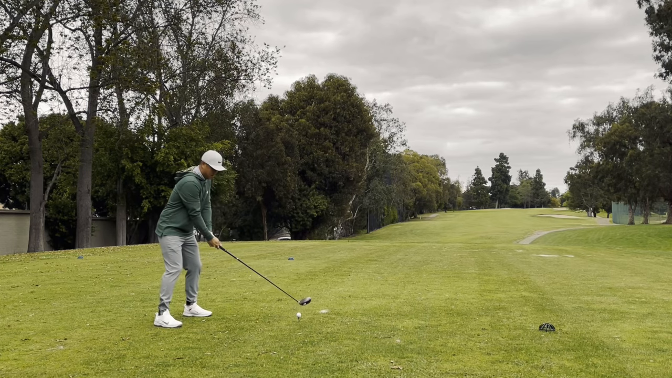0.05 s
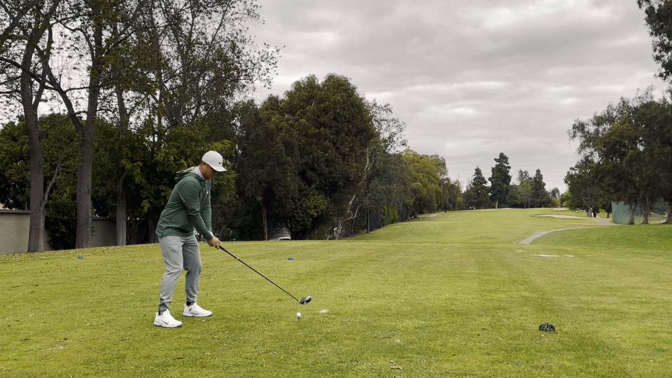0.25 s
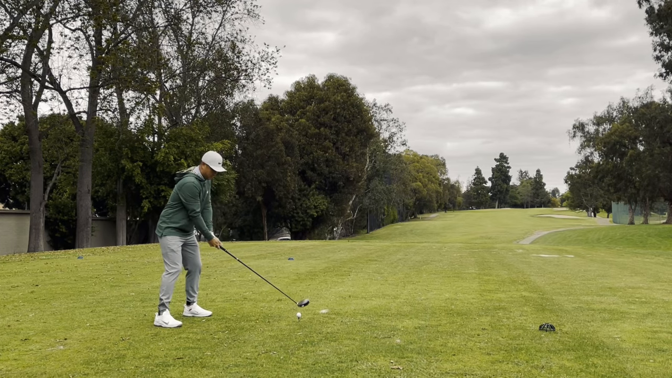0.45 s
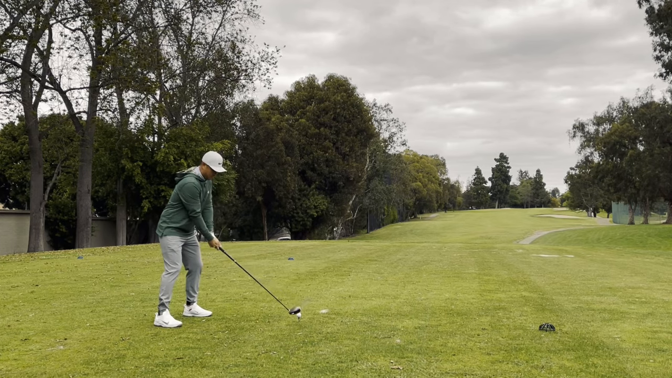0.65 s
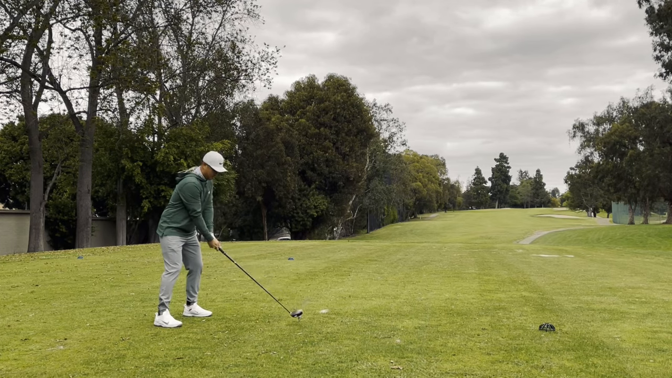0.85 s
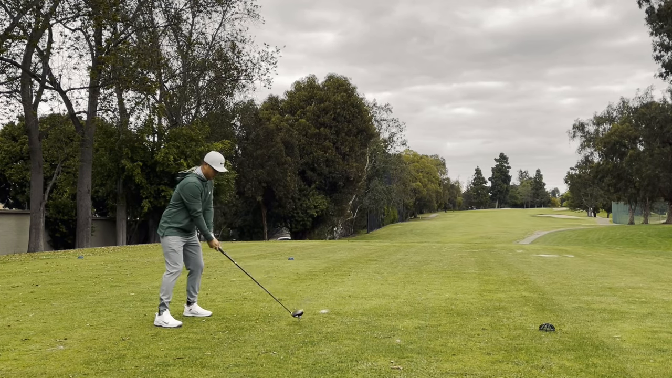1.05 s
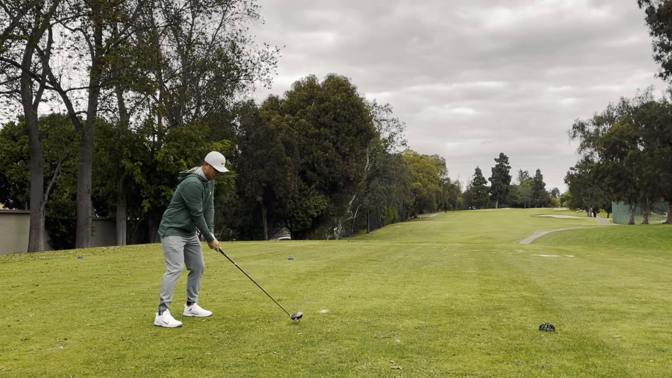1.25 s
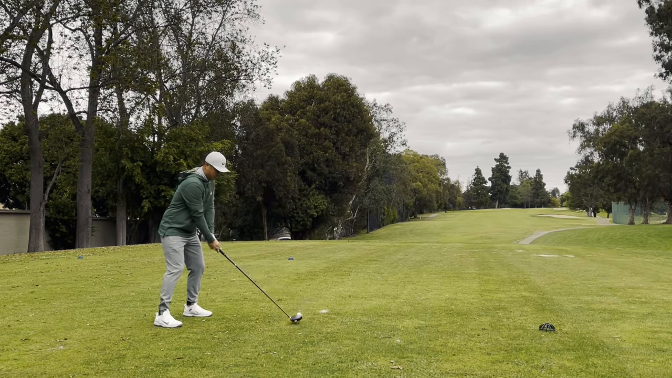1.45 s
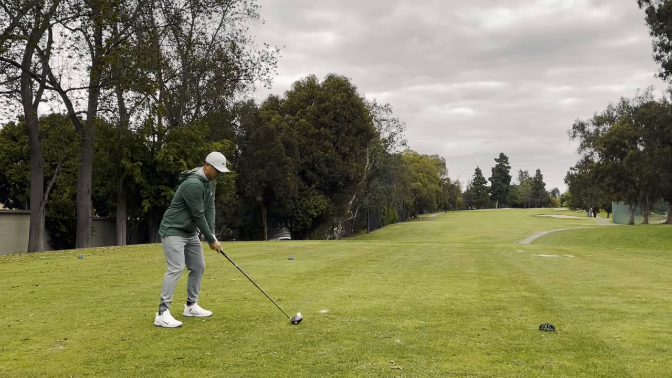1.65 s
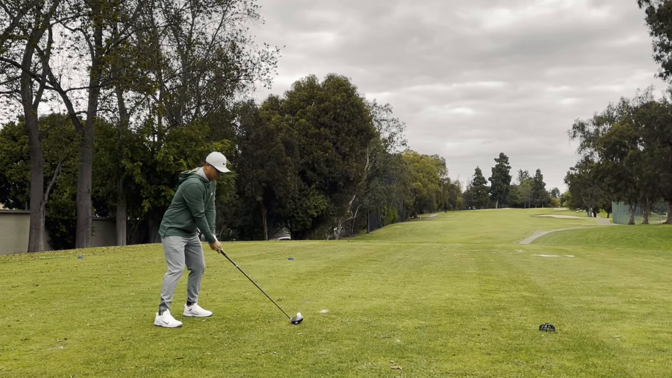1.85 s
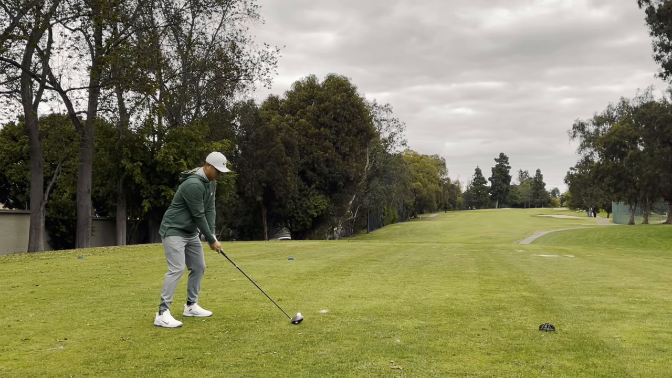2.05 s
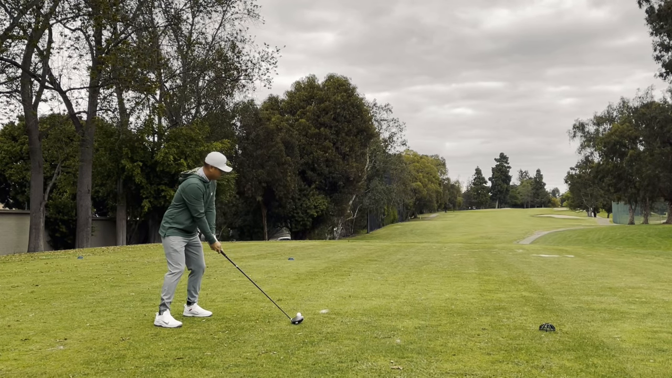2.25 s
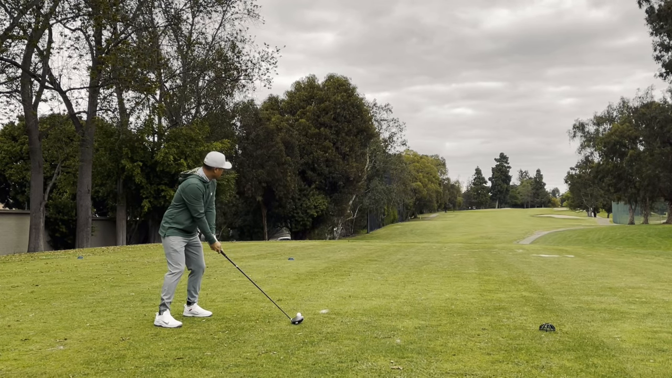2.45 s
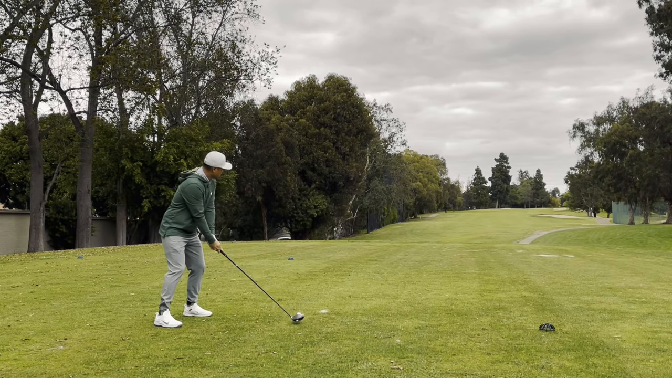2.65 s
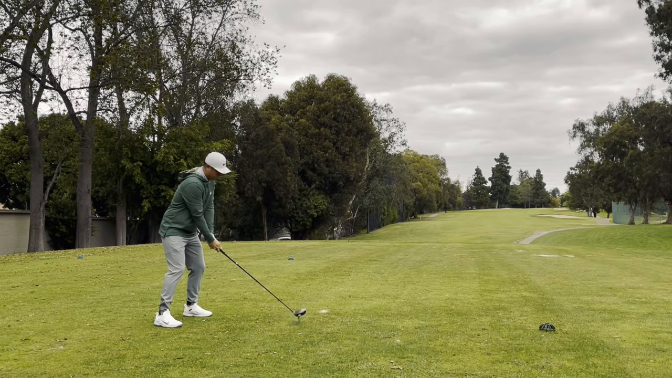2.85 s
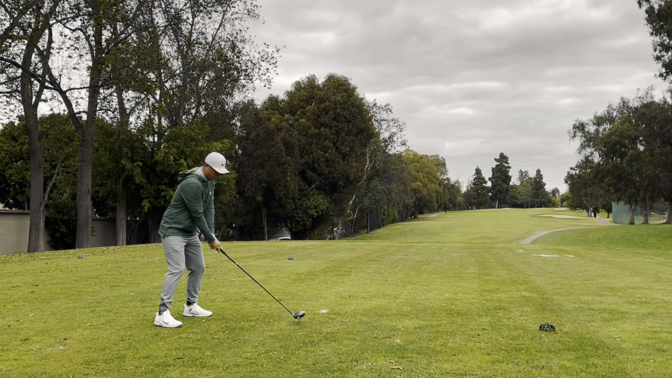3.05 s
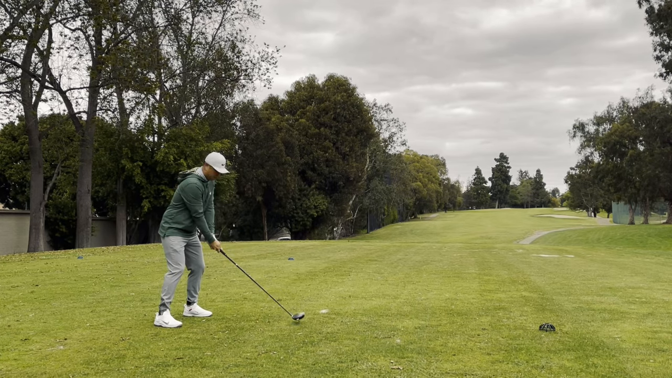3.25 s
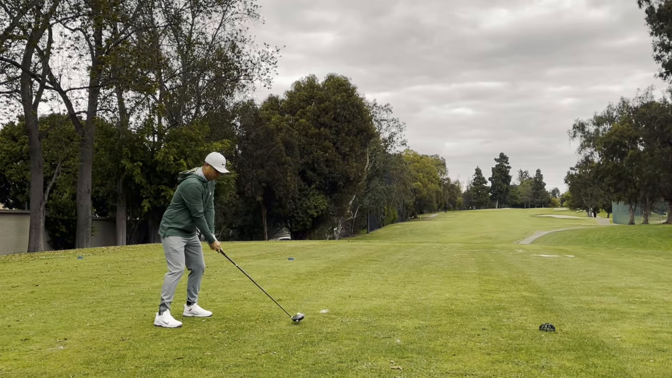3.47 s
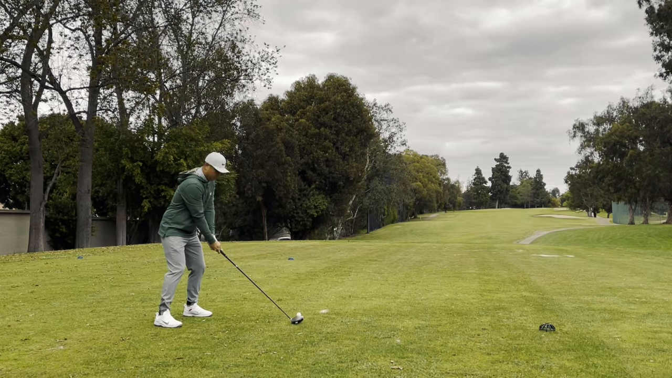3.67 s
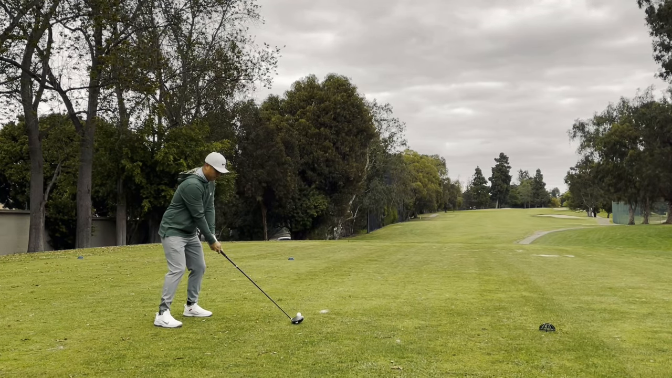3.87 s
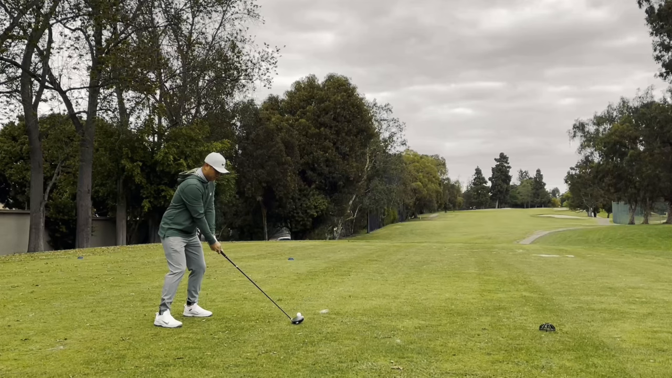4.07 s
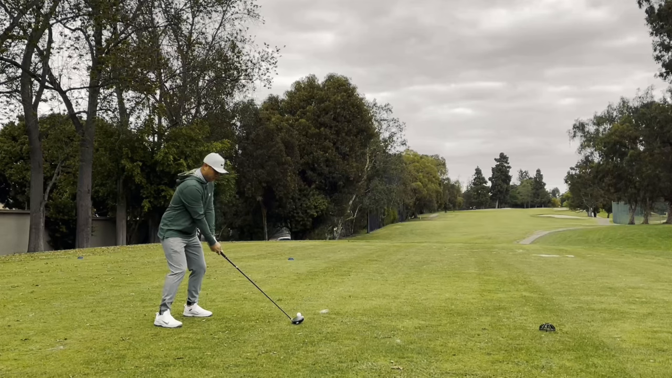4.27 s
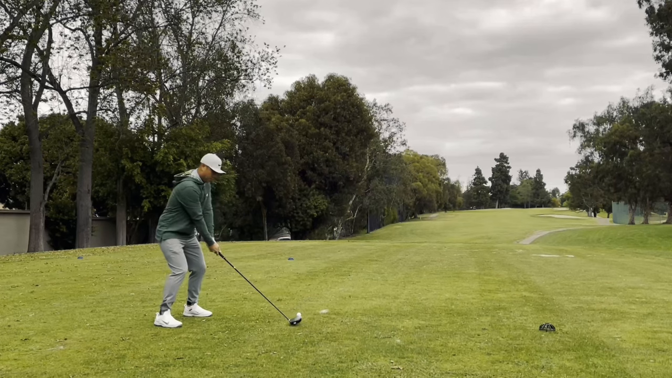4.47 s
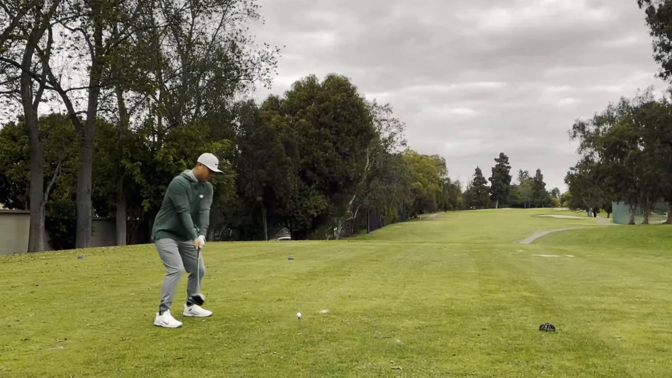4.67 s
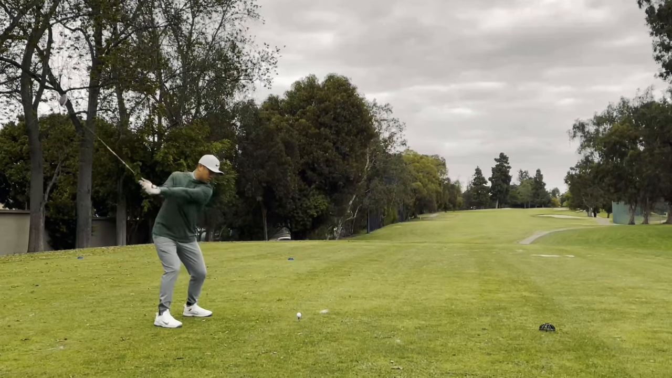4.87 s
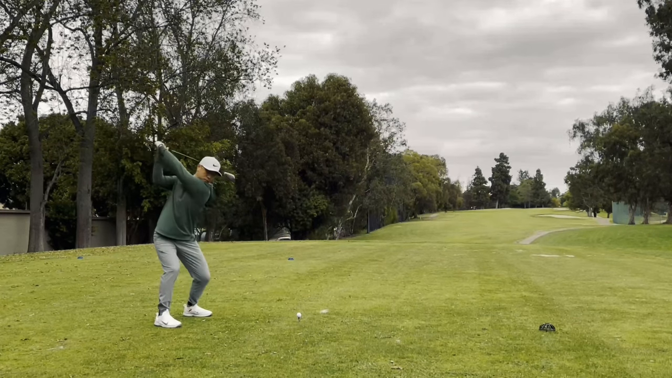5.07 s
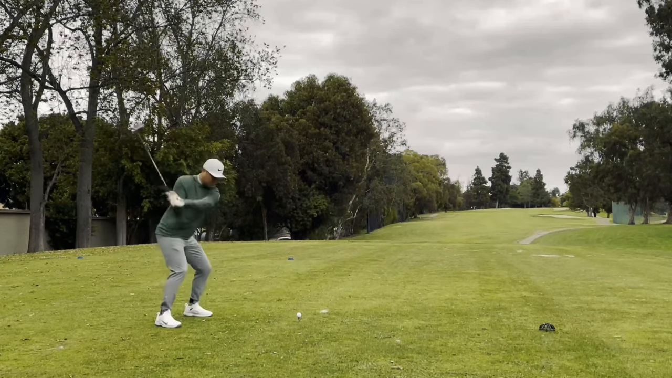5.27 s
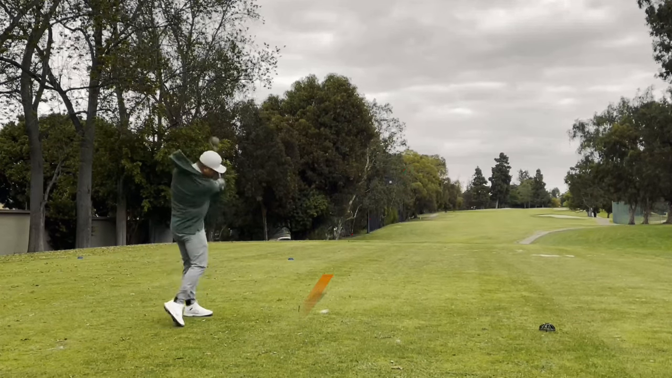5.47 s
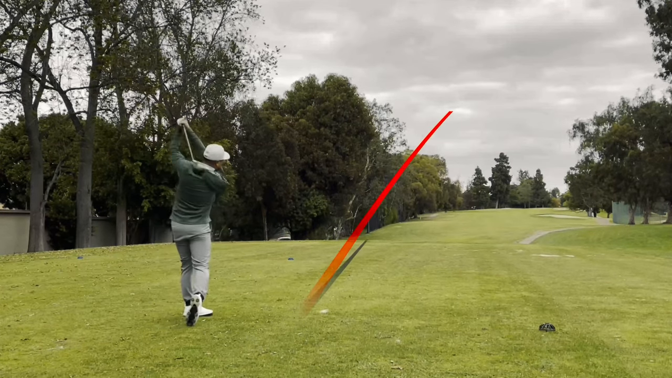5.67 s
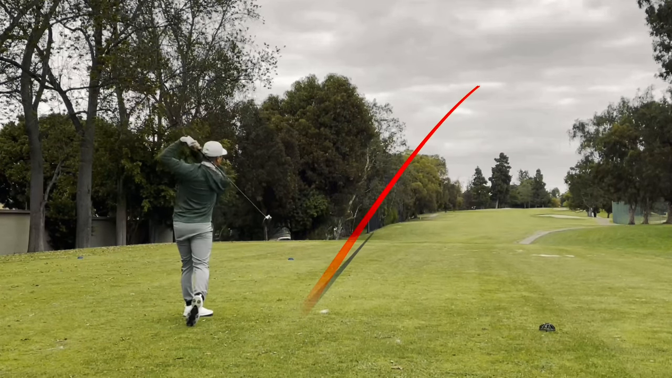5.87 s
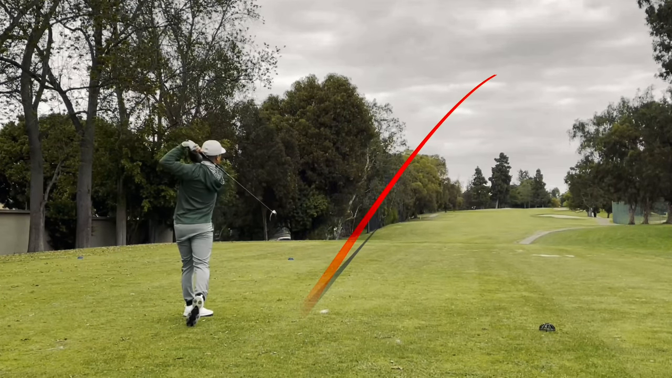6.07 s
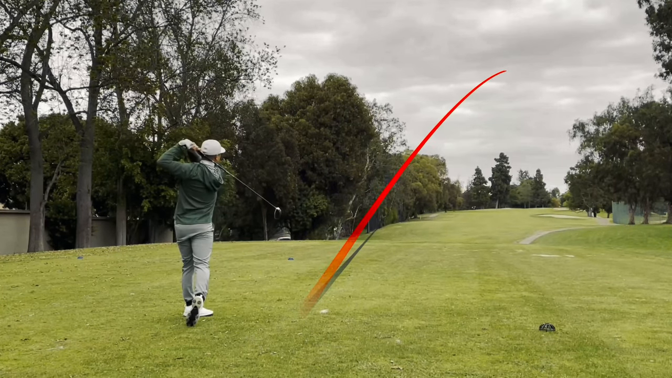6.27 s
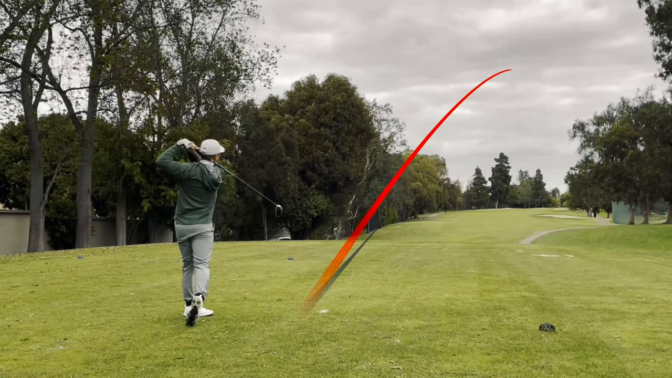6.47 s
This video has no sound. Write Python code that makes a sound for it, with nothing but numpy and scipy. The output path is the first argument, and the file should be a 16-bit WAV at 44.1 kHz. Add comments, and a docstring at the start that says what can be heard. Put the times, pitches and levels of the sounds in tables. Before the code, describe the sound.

Quiet golf course with far engine drone and a few bird chirps, then a quick whoosh, a loud hollow metallic crack and short woodland echo.

```python
"""A golf club swishes down and its hollow head cracks against a ball; the trees throw the crack back.
The swish is shaped noise, the crack a pressure pulse plus ringing modes, the echoes fading noise.
Before and after, sine-wave engines hum over the shaped noise of far traffic and leaves.
Birds whistle and cry with gliding sines, the club taps the turf, and there are faint ticks and clinks.
A limiter ducks everything for a moment after the crack."""
import sys
import numpy as np
from scipy import signal
from scipy.fft import irfft, next_fast_len
from scipy.io import wavfile
from scipy.ndimage import uniform_filter1d, minimum_filter1d

SR = 44100
rng = np.random.default_rng(int(sys.argv[2]) if len(sys.argv) > 2 else 0)


def digitize_waveform(pressure):
    """Quantize a signal to 16-bit integers and store it at the path in sys.argv[1].

    Rows of a 2-D input are taken as channels; values are limited to [-1, 1].
    """
    field = np.atleast_2d(pressure).T
    bounded = np.clip(field, -1, 1)
    quanta = np.round(bounded * 32767).astype(np.int16)
    wavfile.write(sys.argv[1], SR, quanta)


N = 287487
T = np.arange(N) / SR   # time of every sample, s
HZ = np.maximum(np.fft.rfftfreq(next_fast_len(N), 1 / SR), 1)   # pitch of every spectrum bin

# How alike left and right are in open air. Each row: frequency in Hz, likeness (1 is identical).
AIR_LIKENESS = [(60, 1), (130, 0.72), (260, 0.68), (450, 0.8), (800, 0.1), (1300, 0.97), (2500, 0.41),
                (5000, 0.58), (9000, 1), (11500, 1)]
# The same for far tyres. Each row: frequency in Hz, likeness (1 is identical).
TYRE_LIKENESS = [(60, 0.93), (170, 0.7), (500, 0.43), (1450, 0.34), (4180, 0.28), (12100, 0.12)]

# Distant engine running almost steadily. Each row: time in seconds, firing rate in Hz, hum level in dB.
ENGINE = [(0, 66.6, -38.5), (1.5, 66.6, -37), (2.2, 66.7, -33), (3.6, 66.8, -35), (3.9, 67.2, -31),
          (4.1, 66.3, -37.5), (5.6, 66.8, -38.5), (6.15, 67.9, -36.5)]
# The engine's overtones. Each row: multiple of the firing rate, level in dB at the top of the swell.
ENGINE_OVERTONES = [(2, -37.5), (3, -52)]
LOUDEST_S, SWELL_S, SWELL_DB = 5.14, 1, 5   # when the overtones peak, half width and depth of the swell

# Slow swells of the far traffic.
# Each row: time in seconds, rumble level in dB, tyre roar level in dB, tyre hiss level in dB.
TRAFFIC = [(0, -37.5, -49, -60.5), (.55, -38.5, -48.5, -59.5), (1.6, -38.5, -48.5, -59),
           (2.4, -39.5, -48.5, -58.5), (2.9, -38, -48, -57.5), (3.6, -40, -48, -59), (4.5, -38.5, -47, -58),
           (5.3, -39.5, -46.5, -58.5), (6.5, -40.5, -46, -54.5)]
# Colour of the traffic rumble. Each row: frequency in Hz, relative level in dB.
RUMBLE_COLOUR = [(20, -32), (35, -14), (48, -2), (60, 8.5), (76, -0.5), (105, -2.5), (160, -7.5),
                 (250, -15.5), (340, -22), (600, -49)]
# Colour of the tyre roar. Each row: frequency in Hz, relative level in dB.
ROAR_COLOUR = [(150, -26.5), (300, -4.5), (480, -2.5), (650, 0), (920, 3), (1300, -0.5), (2000, -7),
               (2600, -19.5)]
# Colour of the tyre hiss. Each row: frequency in Hz, relative level in dB.
HISS_COLOUR = [(1000, -6), (2000, 0.5), (2600, 2), (3300, -2.5), (4500, -8), (6500, -14), (9000, -48.5),
               (12000, -31)]

# Rumble under the second vehicle. Each row: frequency in Hz, relative level in dB.
PASS_COLOUR = [(20, -23.0), (35, -12.5), (50, 9.5), (65, -2.5), (100, -23)]
PASS_S, PASS_HALF_S, PASS_DB = .62, .55, -33   # loudest moment, half length, drone level
PASS_HZ, PASS_RISE_HZ_PER_S = 59.5, 5   # drone pitch at the loudest moment, and its rise

# Gusts in the leaves. Each row: middle in seconds, half length in seconds, level in dB.
GUSTS = [(0.952, 0.65, -74), (2.3, 0.82, -80), (6.396, 1.2, -72.5)]
# Colour of rustling leaves. Each row: frequency in Hz, relative level in dB.
LEAF_COLOUR = [(3000, -18.5), (5000, 2), (7500, 1), (9300, -5.5), (11500, -22)]

# Dry ticks. Each row: start in seconds, level in dB.
TICKS = [(0.252, -55.5), (.269, -60), (.325, -52), (0.377, -58), (0.851, -46), (.883, -57), (2.591, -61),
         (5.937, -56), (5.970, -46.5), (6.142, -61)]
# Colour of a tick. Each row: frequency in Hz, relative level in dB.
TICK_COLOUR = [(1200, -14), (2000, 4), (4500, 3), (7000, 5), (9000, -0.5), (11500, -5), (13500, -27)]

# Two calls of a small bird, each a curve.
# Each row of a curve: time in seconds, pitch in Hz, level in dB before the wood.
BIRD_CALLS = [
    [(.862, 4400, -61), (.876, 4600, -57), (.891, 5400, -51), (.908, 5100, -57), (.935, 5300, -60),
     (.965, 5000, -66), (.988, 4850, -58), (1.01, 4500, -54), (1.025, 4600, -62), (1.045, 4450, -57),
     (1.07, 4400, -59), (1.085, 4350, -68)],
    [(2.365, 4400, -70), (2.395, 5400, -57), (2.42, 4880, -59), (2.443, 5000, -68), (2.465, 5550, -56),
     (2.49, 5000, -56), (2.53, 4620, -55), (2.59, 4520, -60), (2.63, 4430, -70)],
]
# Arched whistles far off in the trees. Each row: start in seconds, length in seconds, top pitch in Hz,
# share of the pitch lost at the ends, level in dB before the wood.
FAR_WHISTLES = [(2.12, .13, 2580, .04, -66), (2.24, .15, 2860, .03, -68), (2.24, .18, 2540, .03, -66),
                (2.39, .085, 2780, .12, -64), (2.96, .12, 2860, .03, -68), (6.235, .07, 2480, .08, -57.5),
                (6.25, .055, 3430, .06, -62), (6.275, .05, 3200, .04, -63), (6.32, .04, 3330, .08, -62),
                (6.31, .055, 2400, .08, -53.5)]
# Nasal, arched cries of far birds.
# Each row: start in seconds, length in seconds, top pitch in Hz, level in dB before the wood.
CRIES = [(6.14, .19, 830, -63), (6.225, .135, 635, -55)]
# The partials of a cry. Each row: multiple of its pitch, relative level in dB.
CRY_PARTIALS = [(3, 0), (4, -2), (5, -11)]
CRY_SAG = .13   # share of its pitch that a cry loses at its ends

# Colour of a soft tap on turf. Each row: frequency in Hz, relative level in dB.
TURF_COLOUR = [(60, -20), (200, -2), (290, 0), (450, -7), (800, -22)]

# Light metal clinks, as of clubs in a bag. Each row: start in seconds, base level in dB,
# share of the ring time left by damping, pitch of the snap in Hz.
CLINKS = [(3.807, -61, .5, 6500), (3.919, -61, 0.4, 6600), (4.03, -65, 0.6, 6400), (4.905, -64, 0.55, 6400),
          (4.989, -58, .5, 6500), (5.086, -60, .4, 6500), (5.13, -63, 0.38, 6500), (5.22, -60, 0.44, 6400),
          (6.2236, -41, 0.04, 6850), (6.2804, -46, 0.89, 6400), (6.312, -41.5, 0.04, 5300),
          (6.3346, -55, .15, 6300), (6.370, -41, 0.14, 6250), (6.4866, -55, 0.4, 6400)]
# Modes of the metal that clinks.
# Each row: frequency in Hz, level in dB over the clink's base, undamped time to fall 60 dB in seconds.
METAL_MODES = [(5950, -17, 0.037), (6310, -6, 0.2), (6480, 2, .04), (7200, -24, 0.034)]

# Colour of the swish. Each row: frequency in Hz, relative level in dB.
SWISH_COLOUR = [(150, -24), (400, 6), (1000, 4), (2200, -15), (3400, -4.5), (4600, -4.5), (6300, -7.5),
                (8200, -6), (10400, -9), (12000, -10.5), (13000, -30), (15000, -33.5)]
# Colour of the gust pushed by the head. Each row: frequency in Hz, relative level in dB.
GUST_COLOUR = [(60, -7.0), (200, -3), (450, 8), (950, 5.5), (1600, -8.5), (3300, -10.0), (6500, -21),
               (9000, -30)]
SWISH_DB = -40   # at full speed
# the club gathers speed, keeps it through the ball and slows in the follow-through
SWING_START_S, SPEED_UP_S, FULL_SPEED_S, SLOW_DOWN_S = 5.302, .056, 0.092, 0.2

STRIKE_S = 5.4106   # the face meets the ball
# The pressure pulse of the contact. Each row: frequency in Hz, relative level in dB.
CONTACT_COLOUR = [(30, -16.5), (90, -6.5), (240, -1), (450, -6), (900, -17), (1600, -23), (2400, -25.5),
                  (3400, -33), (4700, -21.5), (6500, -23.5), (8000, -24), (11300, -15), (12600, -24),
                  (13500, -50)]
LAG_CYCLES = .91   # each frequency of the pulse arrives about this many of its own cycles late
# Modes of the hollow club head. Each row: frequency in Hz, relative level in dB,
# time to fall 60 dB in seconds, lag in seconds before the mode speaks.
HEAD_MODES = [(932, -32, .03, .0005), (1830, -27, .014, .002), (2300, -30, .014, .002),
              (2765, -25.5, .024, .0005), (2980, -54, .15, .0005), (3445, -46.5, .2, .0005),
              (3530, -54, .17, .0005), (4240, -34, .03, .0005), (4275, -51, .15, .0005),
              (4570, -30, .02, .0005), (5500, -18, .018, .002), (5870, -10.5, .015, .002),
              (6024, -48, .15, .0005), (6240, -48, .15, .0005), (6440, -29, .028, .002),
              (6490, -48, .15, .0004), (7560, -32, .03, .0005), (7677, -47, .15, .0005),
              (8290, -25, .024, .0005), (8510, -48, .15, .0005), (8980, -29, .025, .0005),
              (10850, -24, .018, .0005), (11400, -21, .014, .0004), (15200, -35, .007, .0001)]
# Colour of the crack sent back by turf and trees. Each row: frequency in Hz, relative level in dB.
ECHO_COLOUR = [(300, -27), (900, 7), (1700, 7), (2600, 6), (4200, 8.5), (6300, 8.5), (8500, 8.5),
               (10400, 5), (11700, -1), (13000, -32)]
# Colour of the echo from one trunk. Each row: frequency in Hz, relative level in dB.
BARK_COLOUR = [(600, -14), (1700, 3), (3000, -3), (5000, -1), (8500, 5), (11500, 0), (13000, -13),
               (15500, -16)]

PORT_HZ, PORT_WIDTH_HZ = 10150, 1200   # resonance of the left microphone port
CEILING_DB, CUTOFF_HZ = -1.6, 15800   # the limiter's ceiling, the pitch above which the sound is cut


def from_db(db):
    """Turn decibels into gain."""
    return 10 ** (np.asarray(db) / 20)


def rms_one(x):
    """Scale to an rms (average strength) of 1."""
    return x / np.sqrt(np.mean(x ** 2) + 1e-20)


def in_time(rows):
    """Draw the columns of a table as curves, sample by sample."""
    s, *columns = np.transpose(rows)
    return [np.interp(T, s, c) for c in columns]


def at_hz(points):
    """Join the points of a spectrum on a log frequency axis."""
    hz, value = np.transpose(points)
    return np.interp(np.log(HZ), np.log(hz), value)


def colour(points):
    """Gain at every frequency; above its last point a spectrum falls steeply."""
    return from_db(at_hz(points)) * np.minimum(1, points[-1][0] / HZ) ** 20


def to_time(spectrum):
    """The waveform of a complex spectrum."""
    return irfft(spectrum, next_fast_len(N))[..., :N]


def white():
    """The spectrum of fresh white noise."""
    return rng.standard_normal(len(HZ)) + 1j * rng.standard_normal(len(HZ))


def drift(rate):
    """Random wandering of rms 1, no faster than about this rate in Hz."""
    return rms_one(to_time(white() / (1 + (HZ / rate) ** 4)))


def narrow_noise(hz, width_hz):
    """Noise in a narrow band around a pitch that may move: two drifts carried by sine and cosine."""
    phase = 2 * np.pi * np.cumsum(hz * np.ones(N)) / SR
    return drift(width_hz) * np.sin(phase) + drift(width_hz) * np.cos(phase)


def pan(left_db):
    """Channel gains for a left-right level difference."""
    return from_db(np.array([[left_db], [-left_db]]) / 2)


def air_noise(spectrum, likeness=AIR_LIKENESS, lag_s=0):
    """Coloured stereo noise of rms 1, mixed from a shared and an opposed part; the right may lag."""
    alike = np.clip(at_hz(likeness), -1, 1)
    mid = np.sqrt(1 + alike) * white()
    side = np.sqrt(1 - alike) * white()
    late = np.exp(-2j * np.pi * HZ * lag_s)
    return rms_one(to_time(colour(spectrum) * np.array([mid + side, (mid - side) * late])))


def decay(start, t60, rise):
    """An envelope that swells from its start and falls 60 dB in t60 seconds."""
    age = np.maximum(T - start, 0)
    return (1 - np.exp(-age / rise)) * from_db(-np.minimum(60 * age / t60, 200))


def add(out, start, hz, level_db, t60):
    """Add one struck mode, a dying sine, to a channel."""
    first = int(start * SR)
    age = T[:min(int(2 * t60 * SR), N - first)]
    swell = 1 - np.exp(-age / .0003)
    fade = np.exp(-np.log(1000) * age / t60)
    out[first:first + len(age)] += swell * from_db(level_db) * fade * np.sin(2 * np.pi * hz * age)


def scattered(sound, t60, rise):
    """Dense reflections of a sound, unrelated left and right, from random fading echo paths."""
    paths = (rng.standard_normal((2, N)) * decay(0, t60, rise))[:, :SR]
    return signal.fftconvolve(sound[None], rms_one(paths) / np.sqrt(SR), axes=1)[:, :N]


def engine(waver_db=1.44, waver_rate=2.4, jitter=0.00686):
    """Three harmonics of the firing rate, wavering on their way through the air."""
    hz, hum_db = in_time(ENGINE)
    phase = 2 * np.pi * np.cumsum(hz * (1 + jitter * drift(3.53))) / SR
    swell_db = SWELL_DB * (np.exp(-((T - LOUDEST_S) / SWELL_S) ** 2) - 1)
    harmonics = [(1, hum_db)] + [(multiple, db + swell_db) for multiple, db in ENGINE_OVERTONES]
    hum = 0
    for multiple, db in harmonics:
        hum = hum + from_db(db + waver_db * drift(waver_rate)) * np.sin(multiple * phase)
    return hum


def traffic(lumpy_db=1.0, flutter_db=0.8, roar_lag_s=0.00045):
    """An uneven rumble under the roar and hiss of far tyres on the left, each swelling slowly."""
    rumble_db, roar_db, hiss_db = in_time(TRAFFIC)
    rumble = from_db(rumble_db + lumpy_db * drift(4.4)) * air_noise(RUMBLE_COLOUR)
    roar = from_db(roar_db) * air_noise(ROAR_COLOUR, TYRE_LIKENESS, roar_lag_s)
    hiss = from_db(hiss_db) * air_noise(HISS_COLOUR, TYRE_LIKENESS, roar_lag_s)
    return rumble + from_db(flutter_db * drift(19)) * (roar + hiss) * pan(2.43)


def passing_vehicle(rumble_db=-7):
    """A second vehicle: a slowly rising drone with a rumble beneath it, swelling and fading."""
    hz = PASS_HZ + PASS_RISE_HZ_PER_S * (T - PASS_S)
    drone = np.sin(2 * np.pi * np.cumsum(hz) / SR)
    rumble = from_db(rumble_db) * air_noise(PASS_COLOUR)   # relative to the drone
    nearness = 1 / (1 + ((T - PASS_S) / PASS_HALF_S) ** 4)
    return from_db(PASS_DB) * nearness * (drone + rumble)


def leaves(calm_db=-78):
    """A faint hiss whose power swells with each gust."""
    power = from_db(calm_db) ** 2
    for middle, half, db in GUSTS:
        power = power + from_db(db) ** 2 * np.exp(-((T - middle) / half) ** 2)
    return np.sqrt(power) * air_noise(LEAF_COLOUR)


def ticks():
    """Tiny dry snaps: very short bursts of bright noise."""
    snaps = sum(from_db(db) * decay(s, t60=.025, rise=.0004) for s, db in TICKS)
    return snaps * air_noise(TICK_COLOUR)


def whistle(hz, warble):
    """A sine on a slightly unsteady pitch."""
    return np.sin(2 * np.pi * np.cumsum(hz * (1 + warble * drift(91))) / SR)


def through_wood(song, flutter_db, direct_db, wet_db, wood_t60):
    """Birdsong broken up and blurred by the wood: flutter, plus scattered reflections."""
    song = song * from_db(flutter_db * drift(40))
    return from_db(direct_db) * song + from_db(wet_db) * scattered(song, wood_t60, rise=0.015)


def small_bird(echo_s=.19, echo_db=-19):
    """A thin, warbling whistle that scoops up and slides down; the tree line answers with a copy."""
    song = 0
    for call in BIRD_CALLS:
        hz, db = in_time(call)
        singing = (T > call[0][0]) * (T < call[-1][0])
        song = song + singing * from_db(db) * whistle(hz, warble=.023)
    song = song + from_db(echo_db) * np.roll(song, int(echo_s * SR))
    return through_wood(song, flutter_db=3, direct_db=-5, wet_db=-5, wood_t60=.55)


def arch(start, length, top_hz, sag):
    """Pitch and loudness of a call that rises to its middle and falls again."""
    offset = np.clip(2 * (T - start) / length - 1, -1, 1)
    return top_hz * (1 - sag * offset ** 2), np.sqrt(1 - offset ** 2)


def far_birds():
    """Faint arched whistles of one sine each, and nasal cries of several high partials."""
    song = 0
    for start, length, top_hz, sag, db in FAR_WHISTLES:
        hz, loudness = arch(start, length, top_hz, sag)
        song = song + from_db(db) * loudness * whistle(hz, warble=.009)
    for start, length, top_hz, db in CRIES:
        hz, loudness = arch(start, length, top_hz, CRY_SAG)
        for multiple, partial_db in CRY_PARTIALS:
            song = song + from_db(db + partial_db) * loudness * whistle(multiple * hz, warble=.008)
    return through_wood(song, flutter_db=3.0, direct_db=-1.5, wet_db=-8, wood_t60=.5)


def sole_tap(start=2.7, level_db=-42, t60=0.093):
    """The club is set down softly on the turf behind the ball: a short, dull burst of noise."""
    return from_db(level_db) * decay(start, t60, rise=0.0009) * air_noise(TURF_COLOUR)


def clinks(snap_db=-7.5, snap_t60=0.026, snap_width_hz=560, click_db=-4):
    """Each touch snaps at a pitch of its own and rings the metal's modes with strengths of its own."""
    click = from_db(click_db) * rms_one(to_time(white() * colour(TICK_COLOUR)))
    flutter = drift(snap_width_hz) + 1j * drift(snap_width_hz)
    out = np.zeros(N)
    chances_db = rng.normal(0, 1.5, (len(CLINKS), len(METAL_MODES)))
    for (s, db, free, snap_hz), chance_db in zip(CLINKS, chances_db):
        # the flutter moved up to the snap's pitch is a narrow band of noise
        snap = (flutter * np.exp(2j * np.pi * snap_hz * T)).real + click
        out += from_db(db + snap_db) * decay(s, snap_t60, rise=.0004) * snap
        for (hz, mode_db, t60), own_db in zip(METAL_MODES, chance_db):
            add(out, s, hz, db + mode_db + own_db, t60 * free)
    return out


def shaft_whistle(level_db=-50.5, end_hz=3500, fall_hz_per_s=24000, width_hz=800):
    """The eddies sing in a narrow band that slides down as the club sweeps towards the ball."""
    hz = end_hz + fall_hz_per_s * np.clip(STRIKE_S - T, 0, FULL_SPEED_S)
    return from_db(level_db) * (hz / end_hz) ** 2 * narrow_noise(hz, width_hz)


def swish(push_db=-33.5, push_s=0.02, flutter_db=2):
    """Eddies shed by the shaft hiss with the cube of its speed; the head pushes a low gust."""
    turning_points_s = np.cumsum([SWING_START_S, SPEED_UP_S, FULL_SPEED_S, SLOW_DOWN_S])
    speed = np.interp(T, turning_points_s, [0, 1, 1, 0])
    eddies = speed ** 3 * from_db(flutter_db * drift(120))
    hiss = eddies * (from_db(SWISH_DB) * air_noise(SWISH_COLOUR) + shaft_whistle()) * pan(4.0)
    # the gust grows as the head nears the ball and fades after it
    nearness = np.exp(-abs(T - STRIKE_S) / push_s)
    return hiss + from_db(push_db) * nearness * air_noise(GUST_COLOUR)


def head_whoosh(level_db=-40, whoosh_hz=960, width_hz=110, rise_db_per_s=130, octave_db=-7):
    """The thick head sheds slower eddies: a hollow whoosh that grows until the ball is met."""
    nearness = from_db(-rise_db_per_s * abs(STRIKE_S - T)) * (T < STRIKE_S)
    eddies = narrow_noise(whoosh_hz, width_hz)
    octave = from_db(octave_db) * narrow_noise(2 * whoosh_hz, 4 * width_hz)
    return from_db(level_db) * nearness * (eddies + octave) * pan(3.0)


def contact(start, smear_s=.00025, smear_hz=6350):
    """One pressure pulse whose lows lag by a cycle or so: a crack that falls into a thump."""
    smear = smear_s * np.sin(np.pi / 2 * HZ / smear_hz) ** 2
    delay = LAG_CYCLES / np.maximum(HZ, 30) + smear
    # adding up the delay over frequency gives the phase that causes it
    phase = 2 * np.pi * (HZ * start + np.cumsum(delay) * SR / next_fast_len(N))
    return to_time(colour(CONTACT_COLOUR) * np.exp(-1j * phase))


def strike(blow_db=17, pulse_db=27, ring_db=0, scatter_db=-26.5, scatter_t60=0.03,
           port_lag_s=.000032, after_db=-22, after_t60=.24):
    """The contact pulse, the ringing head, a scatter off the turf and an afterglow from the ground."""
    pulse = contact(STRIKE_S)
    # the head's modes reach the left port of the microphone first
    ring = np.zeros((2, N))
    for hz, level_db, t60, lag in HEAD_MODES:
        add(ring[0], STRIKE_S + lag, hz, level_db, t60)
        add(ring[1], STRIKE_S + lag + port_lag_s, hz, level_db, t60)
    ring = ring + from_db(after_db) * scattered(ring[0], after_t60, rise=.004)
    scatter = from_db(scatter_db) * decay(STRIKE_S, scatter_t60, rise=0.0001) * air_noise(ECHO_COLOUR)
    # blow_db lifts all three parts together
    return from_db(blow_db) * (from_db(pulse_db) * pulse + from_db(ring_db) * ring * pan(2.92) + scatter)


def trees(near_db=-34, near_t60=0.82, far_db=-36, far_t60=0.67, far_delay_s=0.082):
    """Trunks and leaves return the crack as lumpy, fading noise, first close by, then the tree line."""
    near = from_db(near_db) * decay(STRIKE_S, near_t60, rise=0.007)
    far = from_db(far_db) * decay(STRIKE_S + far_delay_s, far_t60, rise=0.0036)
    lumps = from_db(1.5 * drift(250))
    return np.hypot(near, far) * lumps * air_noise(ECHO_COLOUR) * pan(2.0)


def trunk_echo(delay_s=.1075, level_db=-20, t60=.028):
    """A nearby trunk sends back one distinct, bright echo, made as a short burst of noise."""
    return from_db(level_db) * decay(STRIKE_S + delay_s, t60, rise=.0012) * air_noise(BARK_COLOUR)


def scene():
    """The shot amid the sounds of the course."""
    background = engine() + traffic() + passing_vehicle() + leaves()
    details = ticks() + small_bird() + far_birds() + sole_tap() + clinks()
    shot = swish() + head_whoosh() + strike() + trees() + trunk_echo()
    return background + details + shot


def left_port(x):
    """The port's resonance turns the phase of the left side's treble and leaves its level alone."""
    b, a = signal.iirnotch(PORT_HZ, PORT_HZ / PORT_WIDTH_HZ, fs=SR)
    # twice the notch minus the direct sound passes every pitch equally loud
    return np.array([signal.lfilter(2 * b - a, a, x[0]), x[1]])


def limiter(x, hold_s=0.11, release_s=0.05):
    """Gain drops just ahead of a peak, is held, and then creeps back."""
    peak_db = 20 * np.log10(abs(x).max(axis=0) + 1e-9)
    over_db = np.maximum(peak_db - CEILING_DB, 1e-9)
    hold = int(hold_s * SR) // 2 * 2 + 1   # in samples, an odd number
    ahead = SR // 1500   # look-ahead in samples
    held_db = -minimum_filter1d(-over_db, hold, origin=hold // 2)
    # the cut, in dB, dies away exponentially
    cut_db = np.exp(np.maximum.accumulate(np.log(held_db) + T / release_s) - T / release_s)
    return x * from_db(-uniform_filter1d(np.roll(cut_db, -ahead), ahead))


def record(dry):
    """The microphone ports take the sound in; the limiter tames the crack; the top is cut."""
    low_pass = signal.firwin(101, CUTOFF_HZ, fs=SR)
    return signal.fftconvolve(limiter(left_port(dry)), low_pass[None], mode="same", axes=1)


dry = scene()
out = record(dry)
digitize_waveform(out)
```